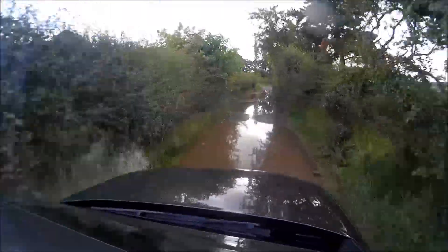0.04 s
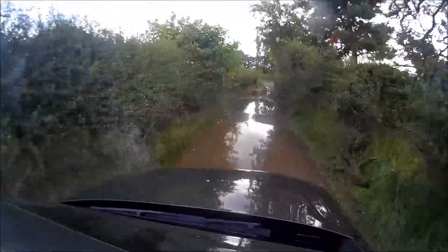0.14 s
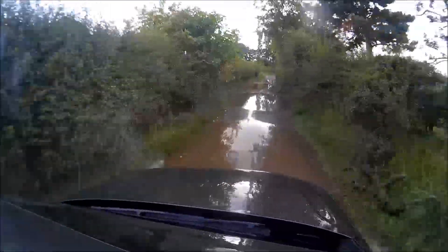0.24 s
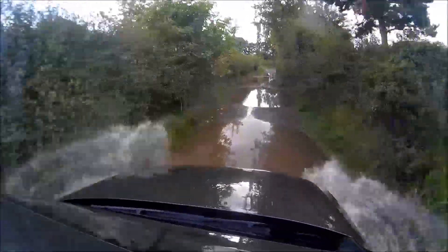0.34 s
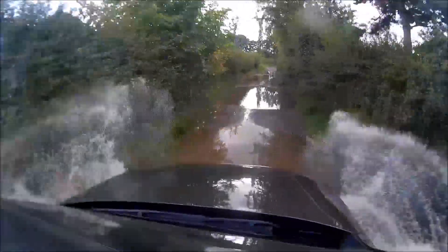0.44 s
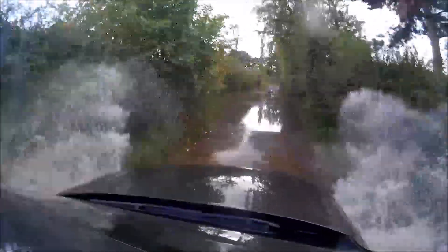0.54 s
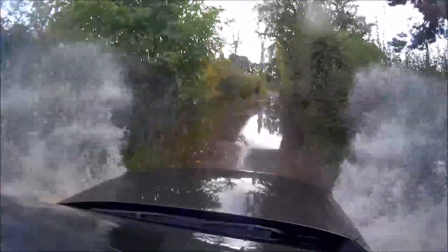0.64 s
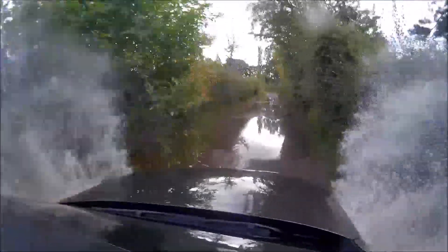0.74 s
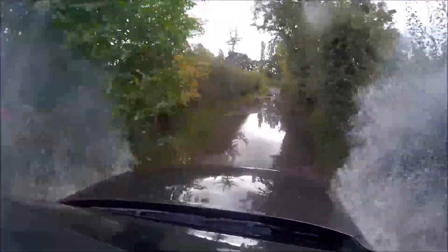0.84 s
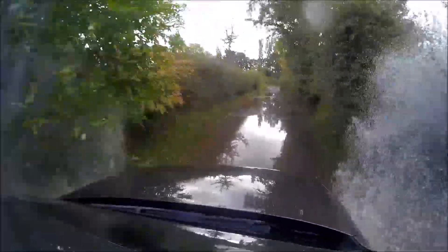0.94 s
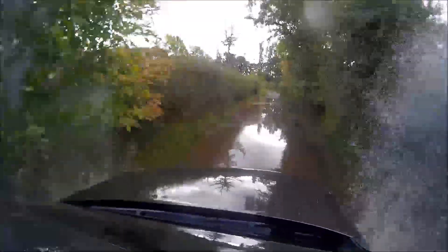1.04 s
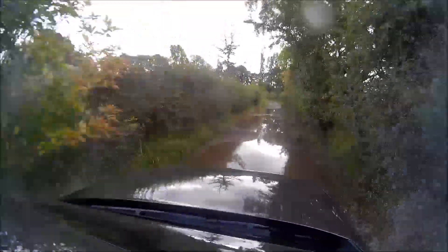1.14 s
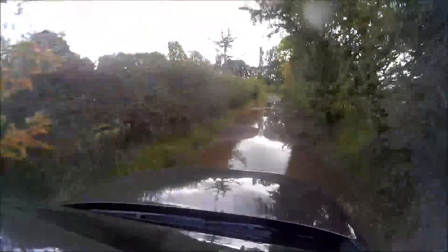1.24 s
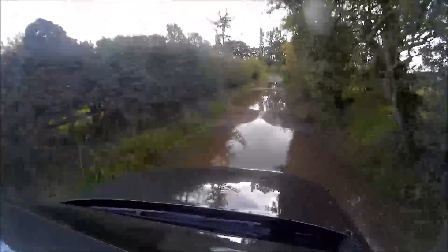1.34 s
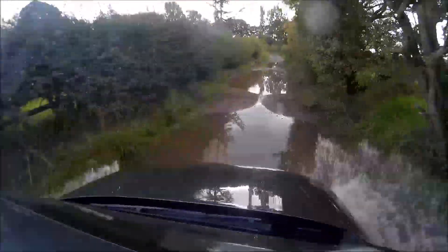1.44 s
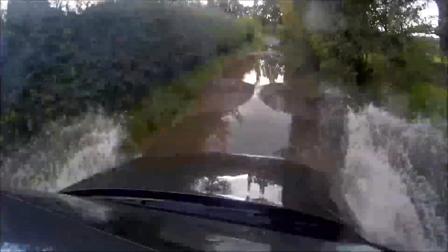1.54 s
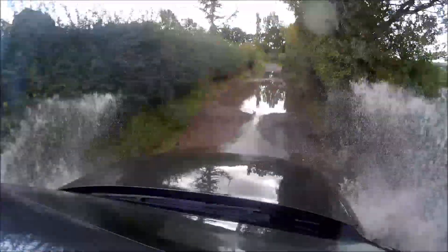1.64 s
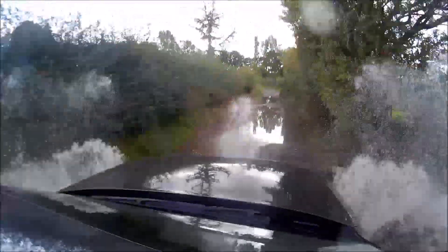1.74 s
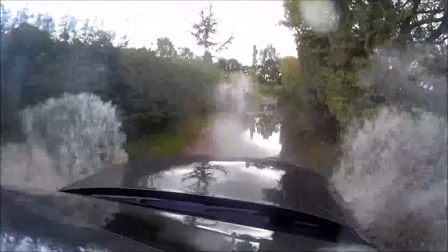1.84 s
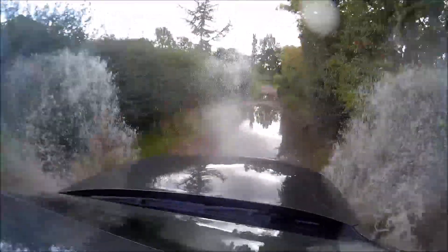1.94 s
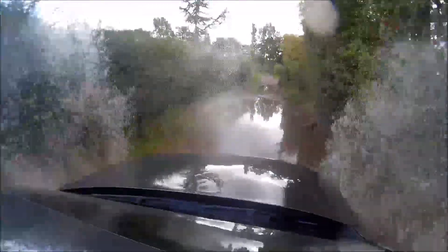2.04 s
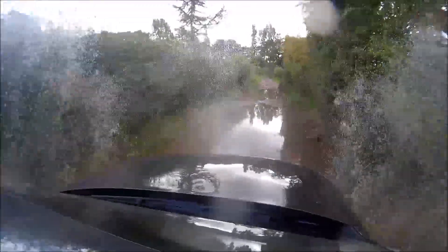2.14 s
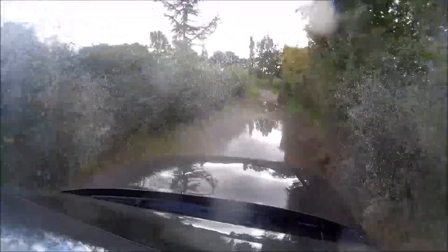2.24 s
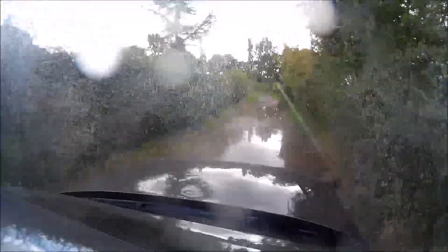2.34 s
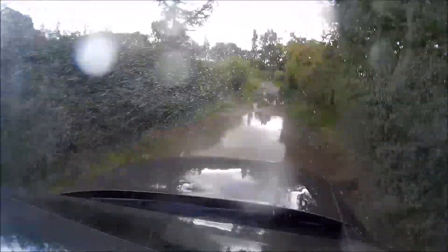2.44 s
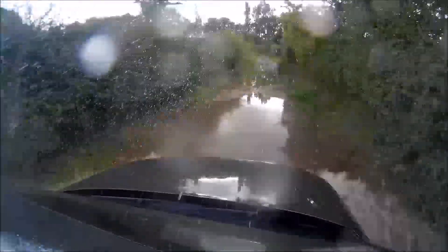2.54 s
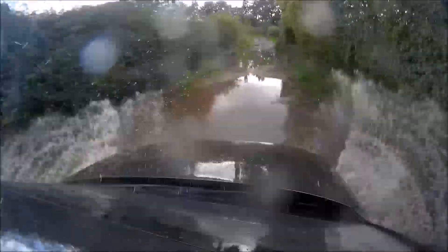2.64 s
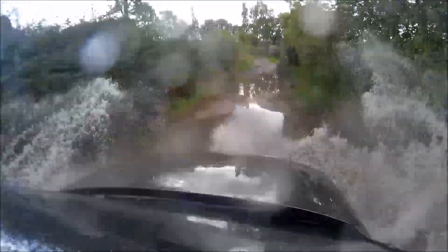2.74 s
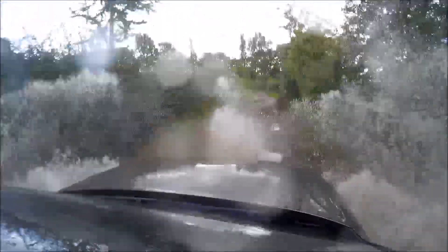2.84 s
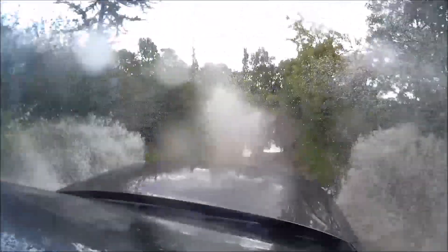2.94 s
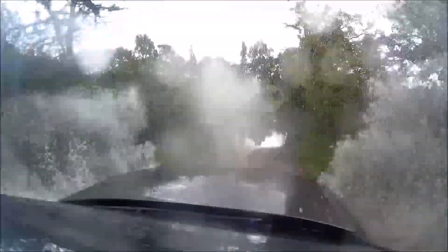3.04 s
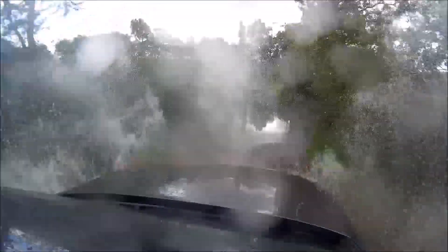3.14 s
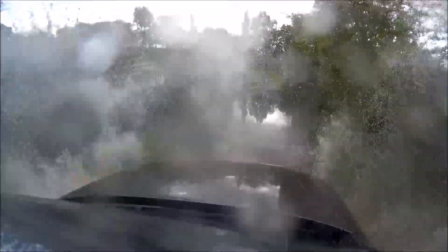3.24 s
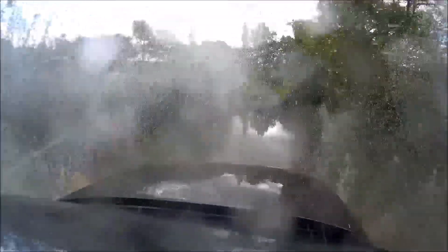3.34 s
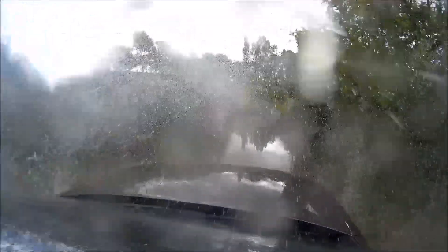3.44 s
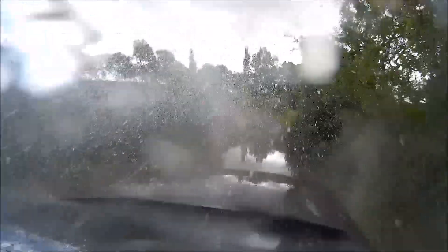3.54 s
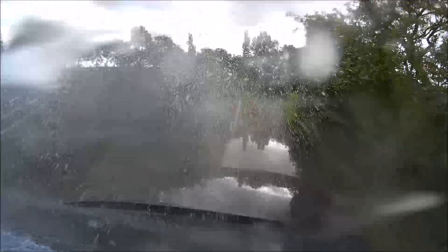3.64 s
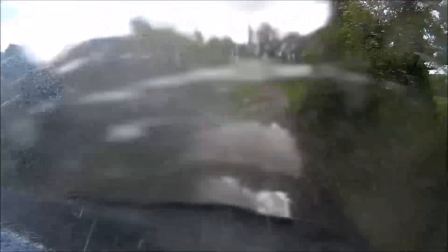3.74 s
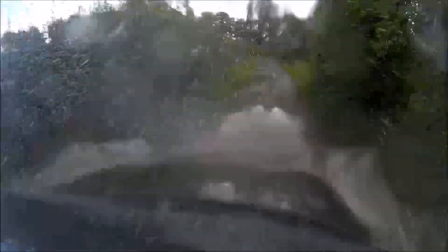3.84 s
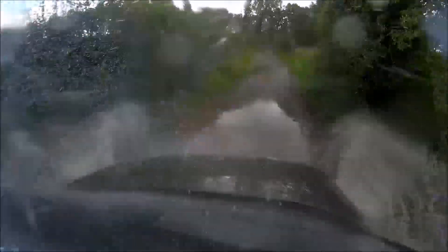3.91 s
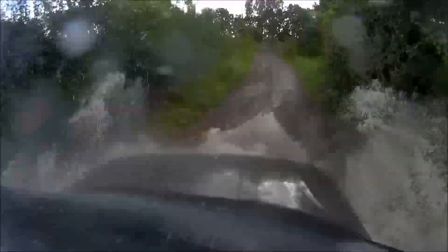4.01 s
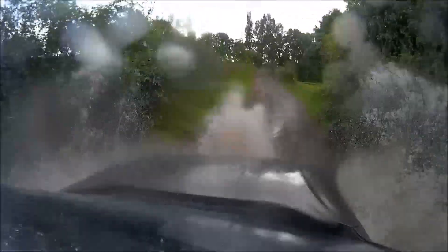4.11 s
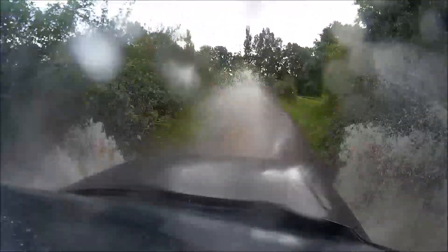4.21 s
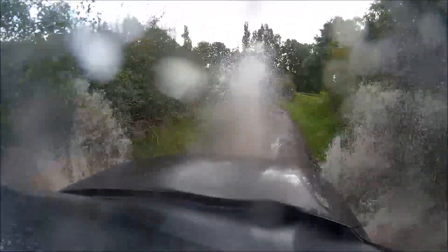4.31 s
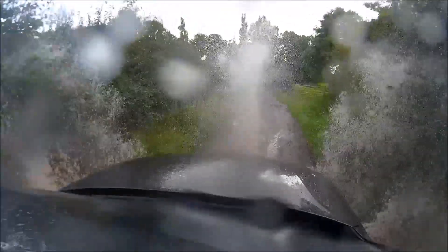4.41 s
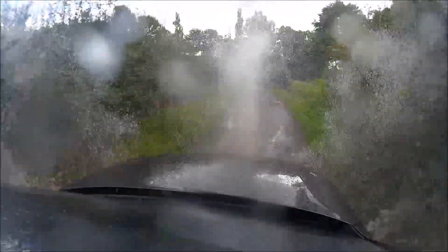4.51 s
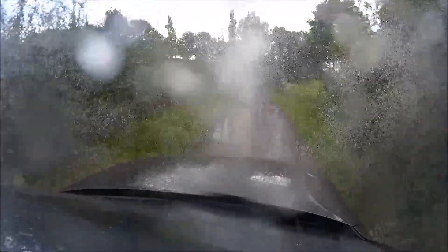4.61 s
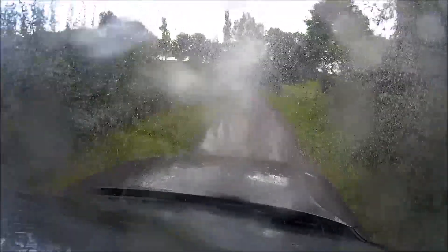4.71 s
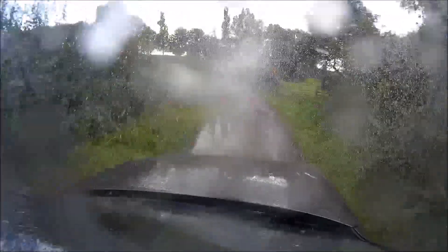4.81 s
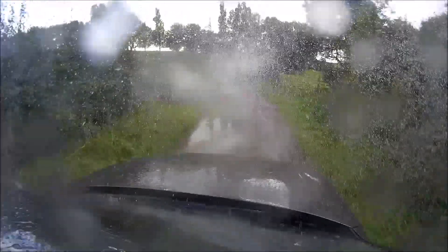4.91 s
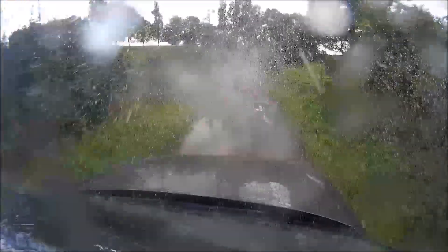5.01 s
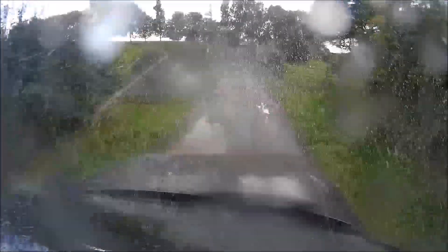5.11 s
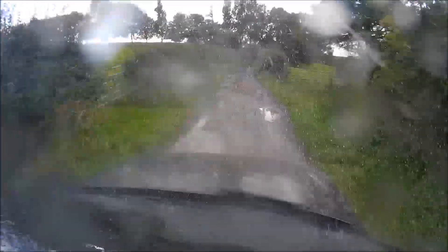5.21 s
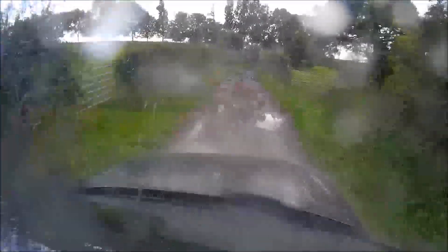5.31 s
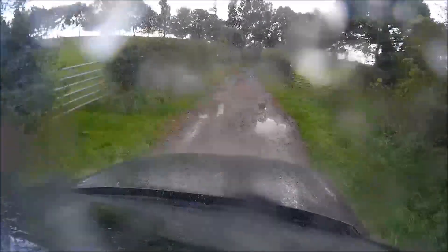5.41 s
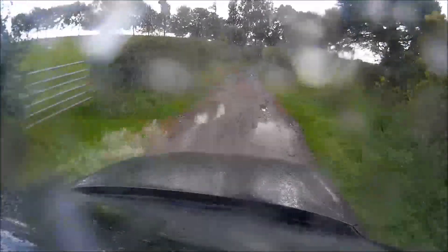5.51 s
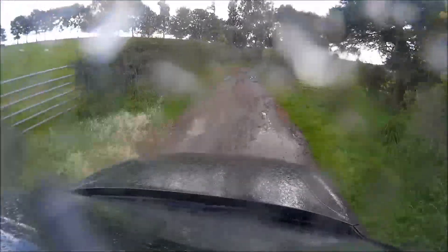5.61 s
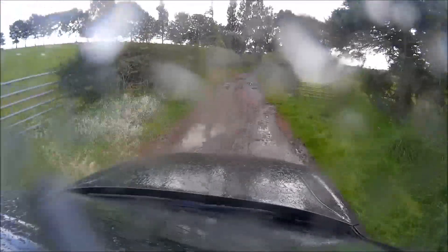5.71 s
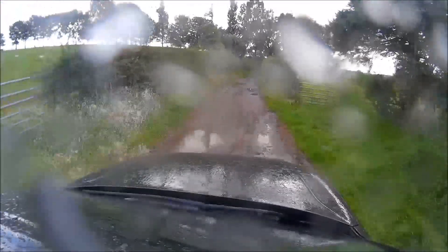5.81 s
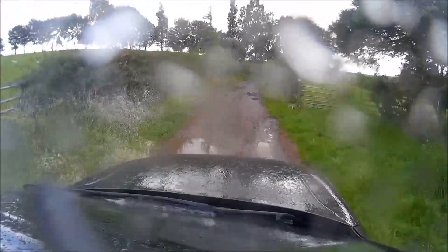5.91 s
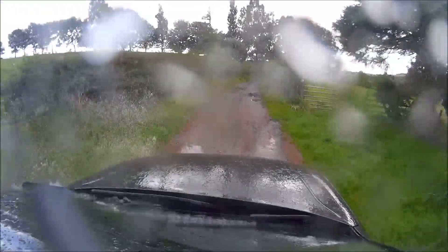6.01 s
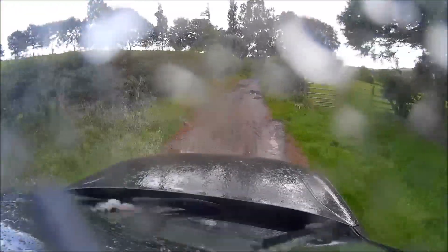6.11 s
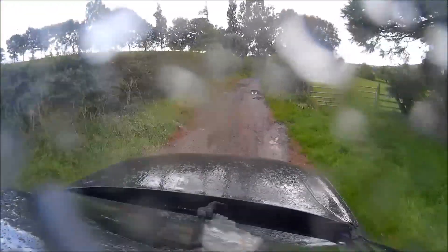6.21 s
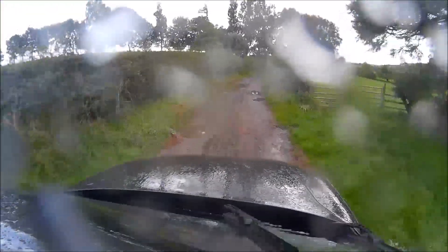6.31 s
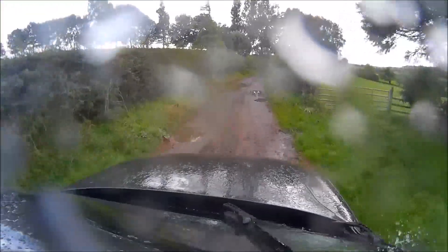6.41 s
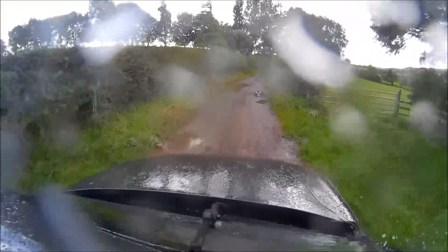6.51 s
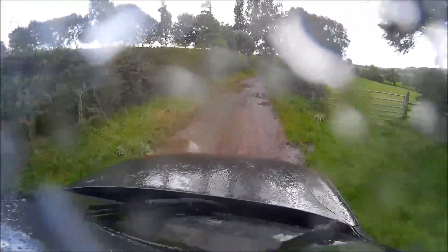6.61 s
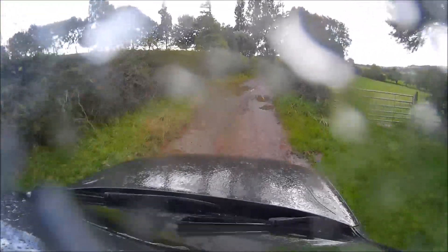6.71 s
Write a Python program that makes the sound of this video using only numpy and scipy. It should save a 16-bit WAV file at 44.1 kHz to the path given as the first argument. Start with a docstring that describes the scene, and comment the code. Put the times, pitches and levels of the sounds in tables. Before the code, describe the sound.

The sound is mono, close and boxy, from a waterproof case mounted on a vehicle's body. A wavering low boom and broad rumble run throughout, with wet tyre churn, soft hiss and a faint, very high electronic whine. From 0.35 to 1.0 s a first puddle surges and gurgles, with a run of woody clacks, strongest near 0.5. At about 1.5 s a sharp loud knock lands with a deep thump and short wash; another thump follows near 1.95. From 2.3 to 3.3 s, repeated puddles slosh, slabs thud in the arches, and brighter knocks and spatter crowd together. At 3.4-3.9 s thrown water pelts the case in a dense, fat, slapping downpour. A heavy thump hits at 4.0. Hiss and light patter return in small bursts around 4.4-5.4; after 5.8 s the hiss drops away, leaving a quieter, duller rumble to nearly 7 s.

```python
"""Farm-track puddles

An SUV ploughs through deep puddles on a farm track, heard from inside a waterproof case on its body.
The body booms over ruts (wavering sine, filtered noise); holes thump; case and mount clack (resonant knocks).
Tyres churn water (coloured impacts), air gulps under the floor (rising sines), slabs thud in the arches.
Thrown water falls as mist (hiss) and a dense patter (impacts through the case modes); big drops hit the case.
A thin electronic whine runs throughout."""
import sys
import numpy as np
from scipy import signal
from scipy.fft import rfft, irfft
from scipy.io import wavfile
from scipy.ndimage import uniform_filter1d

SR = 44100
rng = np.random.default_rng(int(sys.argv[2]) if len(sys.argv) > 2 else 0)


def generate_wav(signal):
    """Clip the signal to [-1, 1] and save it as 16-bit WAV at the path in sys.argv[1]."""
    frames = np.transpose(np.atleast_2d(signal))
    scaled = np.clip(frames, -1, 1) * 32767
    pcm = np.round(scaled).astype(np.int16)
    wavfile.write(sys.argv[1], SR, pcm)


N = 298116
TIME = np.arange(N) / SR

# Body rumble spectrum: (frequency [Hz], relative level [dB])
RUMBLE_SPECTRUM = [(12, -7.5), (24, 0), (38, -2), (55, 7), (85, 9), (110, -6), (150, -23), (220, -18),
                   (400, -49.5)]
# Track between puddles, rough and wet, then smoother and drained:
# (time [s], body drive before trims [dB], churn drive before trims [dB])
TRACK_DRIVE = [(0.0, -27.5, -37), (2.1, -28.5, -39.5), (4.3, -27, -44), (5.3, -30.5, -45),
               (6.0, -30.5, -53.5), (6.76, -32, -54)]
# Ruts that only shake the body: (time [s], length [s], body drive before trims [dB])
BODY_RUTS = [(1.956, 0.037, -21), (4.26, 0.07, -21.5), (5.382, 0.046, -23.5)]
# Wheel drops into a hole: (time [s], peak level [dB])
HOLES = [(1.474, -12), (1.949, -10), (2.699, -17), (3.358, -18), (3.97, -15), (4.019, -12)]
# Case resonances, heard in spray, drops and knock edges: (frequency [Hz], width [Hz], relative level [dB])
CASE_RESONANCES = [(430, 33, -4), (935, 670, -10), (1333, 110, 3.5), (1853, 142, 3), (2123, 64, 0),
                   (2930, 117, -3), (3203, 170, -3.5), (3750, 315, 0.5), (4225, 39, 0), (5470, 560, -5.5),
                   (9050, 2300, -14.5), (10700, 820, -6), (15300, 390, -16)]
# Case and mount resonances: (frequency [Hz], width [Hz], relative level [dB])
MOUNT_RESONANCES = [(1164, 93, 1.5), (1337, 130, 8.5), (1580, 290, -5), (1800, 111, 4)]
# Knocks on the case and mount: jolts, and water hits in the splash at 3.4-3.95 s:
# (time [s], clack level [dB], bright edge re clack [dB])
KNOCKS = [(0.1293, -28.5, -21), (0.3593, -21.5, -18), (0.433, -17.5, -19), (0.4943, -9.5, -18),
          (0.5525, -15, -20), (0.6093, -21, -20), (0.704, -22.5, -19), (0.7725, -21, -17.5),
          (0.8299, -29, -19), (0.891, -23, -20), (0.9534, -30.5, -28), (1.0212, -30.5, -20),
          (1.252, -27, -17), (1.315, -24.5, -23), (1.542, -7, -19.5), (1.604, -32, -37),
          (1.971, -27.5, -48), (2.348, -12.5, -6), (2.4586, -15, -29), (2.5224, -20.5, -7),
          (2.5577, -17, -2), (2.626, -25, -29), (2.6515, -18, -30), (2.6913, -18, -10),
          (2.7252, -15.5, -22), (2.9, -20, -28), (2.96, -11, -14.5), (3.1439, -23, -26),
          (3.201, -16.5, -23), (3.3086, -22.5, -21), (3.3181, -23.5, -6), (3.489, -15.5, -11),
          (3.6553, -20, -6), (3.8664, -16, -3.5), (3.9355, -21, -20), (4.1116, -31, -2)]
# Tyre churn spectrum: (frequency [Hz], relative level [dB])
CHURN_SPECTRUM = [(110, 8.5), (200, 0), (285, 1.5), (420, 4.5), (570, 2), (760, -8), (1050, -2), (1320, -3),
                  (1550, -2.5), (1800, -7), (2100, -3.5), (2500, -39.5), (4000, -43.5)]
# Wheels plough a puddle: (time [s], length [s], wash drive before trims [dB])
PUDDLE_PASSES = [(0.5, 0.26, -33.5), (1.507, 0.059, -25.5), (2.373, 0.16, -30.5), (2.624, 0.14, -28.5),
                 (3.013, 0.24, -29.5), (3.563, 0.24, -32.5), (3.947, 0.052, -28.5)]
# Water slabs on the wheel arches: (time [s], panel level [dB], pitch [Hz])
ARCH_SLAPS = [(0.431, -25.5, 430), (0.521, -21, 436), (0.612, -23.5, 376), (1.513, -21.5, 354),
              (2.3469, -13.5, 385), (2.426, -21.5, 360), (2.493, -19, 390), (2.625, -16.5, 415),
              (2.69, -17, 420), (2.766, -20.5, 377), (3.045, -21, 440), (3.249, -25, 406),
              (3.307, -21.5, 450), (3.593, -21, 390), (3.9734, -13.5, 228), (3.974, -20, 447),
              (4.01, -27, 450)]
# Mist off wet tyres: (time [s], flow before trim [dB], treble gain [dB])
MIST_FLOW = [(0.0, -40, -10.5), (0.88, -41.5, 1), (1.65, -43.5, -4.5), (2.15, -44.5, 3.5), (2.85, -43, 3.5),
             (5.42, -42.5, 2), (5.72, -43, -3.5), (5.86, -55.5, -5), (6.76, -59, -8)]
# Thrown water lands on the car: (time [s], length [s], flow before trim [dB], fat re fine drops [dB])
WATER_SHOWERS = [(2.18, 0.048, -40, -19.5), (2.352, 0.12, -30.5, -20), (3.177, 0.09, -28, -13),
                 (3.427, 0.29, -24, 2), (3.666, 0.26, -20.5, 9.5), (4.052, 0.31, -37, -4),
                 (4.564, 0.057, -36.5, -6.5), (4.73, 0.22, -38, 2.5), (5.015, 0.1, -33, 10.5),
                 (5.276, 0.032, -36.5, 1.5), (5.418, 0.032, -36.5, -1.5)]
# Drops and gobs on the case: (time [s], smack level [dB], top-band tick re smack [dB])
CASE_DROPS = [(1.355, -20.5, -9.5), (1.48, -28.5, 6.5), (2.4262, -20.5, -15), (2.4632, -21, -23),
              (2.5427, -19.5, 1), (2.707, -28, -7), (3.42, -23, -16), (3.4291, -21, -16),
              (3.5311, -18.5, -3.5), (3.6, -18.5, -15), (3.611, -13.5, -37), (3.683, -24, -3),
              (3.6908, -20, -5), (3.7156, -16.5, -8.5), (3.7463, -12.5, -20), (3.7852, -15, -16),
              (3.791, -14.5, -21), (3.7948, -18, -18), (3.8302, -17, -10.5), (3.8531, -19, -30),
              (3.902, -19.5, -21), (4.4276, -35, -25), (4.7495, -30.5, -7), (4.7657, -28.5, -8),
              (5.007, -30, -9.5), (5.0467, -30, -14), (5.0704, -29.5, -7), (5.1057, -28, -23),
              (5.1685, -29, -10), (5.2704, -29, -28), (5.628, -38.5, -10)]

TOP_HZ = 15450
WHINE_HZ, WHINE_DB = 9519, -58.5
BOOM_HZ = 72.9
RUT_ATTACK_S, RUT_RELEASE_S = 0.029, 0.12
PUDDLE_RISE_SHARE, PUDDLE_RELEASE_SHARE = 0.36, 0.81  # time constants per puddle length
PUDDLE_BOOM_DB, HEAVE_DB = 0, 6  # re puddle wash drive
BUMP_HZ, BUMP_DECAY_S = 61, 0.0073
HIT_S = 0.014  # time over which a hit's level is reckoned
AFTER_RING_HZ, AFTER_RING_DB = 1739, -13.5
SLOSH_HZ, SLOSH_OCTAVES, SLOSH_DB = 416.6, 0.853, -0.5  # middle pitch, range, level re wash drive
GULPS_PER_S, GULP_DECAY_CYCLES, GULP_RISE_PER_S = 200, 5, 2
SHOWER_ATTACK_S, SHOWER_RELEASE_S = 0.084, 0.06
# Drops re mist at the downpour level; dB change per dB of shower
DOWNPOUR_DB, DROP_SHARE_DB, DROP_SHARE_SLOPE = -16, 14, 0.37
CLUMP_DB, CLUMPS_PER_S = 3.5, 45


def undb(db):
    """Decibels to gain."""
    return 10 ** (np.asarray(db) / 20)


def decibels(power):
    """Power to decibels."""
    return 10 * np.log10(power + 1e-12)


def curve(rows, axis=1):
    """Interpolate one table column at every sample."""
    columns = np.transpose(rows)
    return np.interp(TIME, columns[0], columns[axis])


def unit(x):
    """Scale to rms 1."""
    return x / np.sqrt(np.mean(x ** 2))


def peak(x):
    """Scale to peak 1."""
    return x / np.abs(x).max()


def hit(x):
    """Scale a short sound to the energy of rms 1 held for HIT_S."""
    return x / np.sqrt(np.sum(x ** 2) / (HIT_S * SR))


def add(track, s, sound):
    """Mix a sound in at a time."""
    start = max(int(s * SR), 0)
    track[start:start + len(sound)] += sound[:max(N - start, 0)]


def walk(rate_hz):
    """Smooth random wander with a spread near 1."""
    hold = max(int(SR / rate_hz), 1)
    steps = np.repeat(rng.standard_normal(N // hold + 1), hold)
    smooth = uniform_filter1d(uniform_filter1d(steps, hold), hold)
    return 1.3 * smooth[:N]


def cut(x, hz, kind, order=2):
    """Low-pass or high-pass."""
    return signal.sosfilt(signal.butter(order, min(hz, TOP_HZ), kind, fs=SR, output="sos"), x)


def shape(x, gain_at, size=8192):
    """Minimum-phase filter whose gain is a function of frequency."""
    gain = gain_at(np.arange(size // 2 + 1) * SR / size + 1)
    cepstrum = irfft(np.log(gain + 1e-6))
    # fold to a causal response
    cepstrum[1:size // 2] *= 2
    cepstrum[size // 2 + 1:] = 0
    response = irfft(np.exp(rfft(cepstrum)))
    return signal.fftconvolve(x, response)[:len(x)]


def colour(x, points):
    """Filter by a spectrum, interpolated over log frequency."""
    hz, db = np.transpose(points)
    return shape(x, lambda f: undb(np.interp(np.log(f), np.log(hz), db)))


def ring(x, modes):
    """Filter by a set of resonances whose powers add."""
    def gain_at(f):
        power = sum(undb(db) ** 2 / (1 + ((f * f - hz * hz) / (f * width_hz)) ** 2)
                    for hz, width_hz, db in modes)
        return np.sqrt(power)
    return shape(x, gain_at)


def blow(scatter_s, scatter_db, size=4096):
    """A sharp push plus a dying scatter of smaller contacts."""
    force = rng.standard_normal(size) * np.exp(-np.arange(size) / SR / scatter_s)
    force *= undb(scatter_db) / np.linalg.norm(force)
    force[0] += 1
    return force


def patter(per_s, spread_db):
    """Random impacts, many small and a few large, at rms 1."""
    sizes = undb(spread_db * np.minimum(rng.exponential(size=N), 4.5))
    strikes = rng.random(N) < per_s / SR
    return unit(strikes * sizes * rng.choice([-1, 1], N))


def swell(s, length_s, db, attack_s, release_s):
    """Power of a surge that builds up to s, holds and dies away."""
    away = np.maximum(s - TIME, 0) / attack_s + np.maximum(TIME - s - length_s, 0) / release_s
    return (undb(db) * np.exp(-np.minimum(away, 20))) ** 2


def ploughing():
    """Power of the wash under the wheels; longer puddles rise and die away more slowly."""
    return sum(swell(s, length_s, db, PUDDLE_RISE_SHARE * length_s, PUDDLE_RELEASE_SHARE * length_s)
               for s, length_s, db in PUDDLE_PASSES)


def falling():
    """Power of the thrown water landing on the car."""
    return sum(swell(s, length_s, db, SHOWER_ATTACK_S, SHOWER_RELEASE_S)
               for s, length_s, db, _ in WATER_SHOWERS)


def electronic_whine():
    """Steady thin tone."""
    return undb(WHINE_DB) * unit(np.sin(2 * np.pi * WHINE_HZ * TIME))


def body(plough):
    """Track shakes the body: a wavering boom over broad rumble, driven by track, ruts and puddles."""
    phase = 2 * np.pi * np.cumsum(BOOM_HZ + 3.79 * walk(14)) / SR
    boom = unit(np.sin(phase) * undb(3.45 * walk(22)))
    rumble = unit(colour(rng.standard_normal(N), RUMBLE_SPECTRUM))
    ruts = sum(swell(s, length_s, db, RUT_ATTACK_S, RUT_RELEASE_S) for s, length_s, db in BODY_RUTS)
    ride_db = decibels(undb(curve(TRACK_DRIVE)) ** 2 + ruts + undb(PUDDLE_BOOM_DB) ** 2 * plough)
    # harder shaking favours the broad rumble
    rumble_db = -1.5 + 0.13 * (ride_db - ride_db.mean())
    return (undb(-2.5) * boom + undb(rumble_db) * rumble) * undb(ride_db)


def suspension(plough):
    """Deep water heaves against the floor; wheels thump into holes."""
    heave = unit(cut(cut(rng.standard_normal(N), 64.5, "low", order=4), 28, "high"))
    out = heave * undb(HEAVE_DB) * np.sqrt(plough)
    thump = peak(np.sin(2 * np.pi * BUMP_HZ * TIME) * TIME * np.exp(-TIME / BUMP_DECAY_S))
    for s, db in HOLES:
        add(out, s, undb(db) * thump)
    return out


def knock(edge_db):
    """A short woody clack, slightly retuned each time, with a bright edge and a brief after-ring."""
    tuning = 1 + 0.015 * rng.standard_normal()
    force = blow(scatter_s=0.004, scatter_db=-11)
    # smear the contact over a few milliseconds
    force = np.convolve(force, blow(scatter_s=0.002, scatter_db=-7, size=256))[:len(force)]
    clack = ring(force, [(hz * tuning, width_hz, db) for hz, width_hz, db in MOUNT_RESONANCES])
    clack = cut(cut(clack, 2360, "low", order=6), 944, "high", order=3)
    after = ring(clack, [(AFTER_RING_HZ, 25, 0)])
    edge = ring(blow(scatter_s=0.0014, scatter_db=12), CASE_RESONANCES)
    edge = cut(cut(edge, 2150, "high", order=4), 5200, "low")
    return hit(clack) + undb(AFTER_RING_DB) * hit(after) + undb(edge_db) * hit(edge)


def case_and_mount():
    """Jolts, and water hits in the splash at 3.4-3.95 s, knock the case and mount."""
    out = np.zeros(N)
    for s, db, edge_db in KNOCKS:
        add(out, s, undb(db) * knock(edge_db))
    return out


def arches():
    """Slabs of water break up on an arch, which rings briefly and passes on a low bump."""
    out = np.zeros(N)
    for s, db, hz in ARCH_SLAPS:
        force = blow(scatter_s=0.0061, scatter_db=-0.5)
        panel = ring(force, [(hz, 130, 0), (1.34 * hz, 150, -10)])
        panel = cut(cut(panel, 1.47 * hz, "low", order=3), 0.54 * hz, "high")
        bump = cut(ring(force, [(55.4, 170, 0)]), 170, "low")
        add(out, s, undb(db) * (hit(panel) + undb(-6.5) * hit(bump)))
    return out


def slosh(plough):
    """Water surging under the floor traps air pockets; each gulps briefly, rising in pitch."""
    out = np.zeros(N)
    age_s = TIME[:SR // 8]
    for when, size, strength in rng.random((int(GULPS_PER_S * N / SR), 3)):
        hz = SLOSH_HZ * 2 ** (SLOSH_OCTAVES * (size - 0.5))
        cycles = hz * age_s
        phase = 2 * np.pi * cycles * (1 + GULP_RISE_PER_S * age_s)
        envelope = (1 - np.exp(-cycles)) * np.exp(-cycles / GULP_DECAY_CYCLES)
        add(out, when * N / SR, (0.5 + strength) * np.sin(phase) * envelope)
    return unit(out) * undb(SLOSH_DB) * np.sqrt(plough)


def tyres(plough):
    """Lumps of water and mud churn in uneven surges; the mount chatters along, more in heavy churn."""
    lumps = patter(per_s=300, spread_db=3.5) + undb(-0.5) * rng.standard_normal(N)
    wash = unit(colour(lumps * undb(2.1 * walk(45)), CHURN_SPECTRUM))
    taps = patter(per_s=200, spread_db=3)
    chatter = unit(cut(ring(taps, MOUNT_RESONANCES), 1850, "low", order=5))
    churn_db = decibels(undb(curve(TRACK_DRIVE, axis=2)) ** 2 + plough / 2)
    chatter_db = -4 + 0.48 * (churn_db - churn_db.max())
    return (wash + undb(chatter_db) * chatter) * undb(churn_db + 2.5)


def mist_hiss():
    """Mist: a dull hiss with a bright top of varying strength, both through the case."""
    dull = cut(unit(ring(rng.standard_normal(N), CASE_RESONANCES)), 4960, "low")
    bright = cut(unit(ring(rng.standard_normal(N), CASE_RESONANCES)), 4400, "high")
    return (dull + undb(curve(MIST_FLOW, axis=2)) * bright) * undb(1.43 * walk(40))


def fine_drops(crowd):
    """Fine drops: each size ticks in its own band, through the case."""
    ticks = sum(ring(patter(per_s=160 * crowd, spread_db=2.0), [(hz, 0.5 * hz, 0)])
                for hz in np.geomspace(1700, 12500, 5))
    return unit(ring(ticks, CASE_RESONANCES))


def fat_drops(crowd):
    """Fat drops spread for about a millisecond; each stream of them has its own dullness."""
    slaps = 0
    for top_hz in np.geomspace(2800, 6500, 5):
        impacts = patter(per_s=65 * crowd, spread_db=2)
        spread = signal.fftconvolve(impacts, blow(scatter_s=0.001, scatter_db=0.0))[:N]
        slaps = slaps + unit(cut(spread, top_hz, "low", order=3))
    return unit(ring(slaps, CASE_RESONANCES))


def spray(shower):
    """Mist hisses, fine drops tick, fat drops slap; more water brings more drops, in clumps."""
    flow_db = decibels(undb(curve(MIST_FLOW)) ** 2 + shower)
    crowd = undb(0.5 * (flow_db - flow_db.max()))
    # heavier showers lift the drops out of the mist
    share = undb(DROP_SHARE_DB + DROP_SHARE_SLOPE * (decibels(shower) - DOWNPOUR_DB))
    mist = mist_hiss()
    fine = fine_drops(crowd)
    fat = fat_drops(crowd)
    fatness = undb(curve([(s + length_s / 2, fat_db) for s, length_s, _, fat_db in WATER_SHOWERS]))
    # offset the level change due to drop rate and mix
    drops = (fine + fatness * fat) / np.sqrt((1 + fatness ** 2) * crowd / crowd.mean())
    drops = drops * undb(0.5 + CLUMP_DB * walk(CLUMPS_PER_S))
    water = (share * drops + mist) / np.sqrt(1 + share ** 2)
    return cut(water, 200, "high") * undb(flow_db + 1.4)


def big_drops():
    """Water smacks the case: a burst and brief spatter ring its walls, under a bright tick."""
    out = np.zeros(N)
    for s, db, top_db in CASE_DROPS:
        burst = blow(scatter_s=0.00088 * 2 ** rng.uniform(-1.3, 1), scatter_db=-7)
        spatter = blow(scatter_s=0.0046, scatter_db=-6)
        smack = ring(np.convolve(burst, spatter)[:len(burst)], CASE_RESONANCES)
        # brighter drops have less low end
        low_edge_hz = 1650 * undb(0.38 * (top_db + 5.0))
        smack = cut(cut(smack, low_edge_hz, "high", order=3), 4100, "low")
        tick = ring(blow(scatter_s=0.00067, scatter_db=11), CASE_RESONANCES)
        tick = cut(tick, 6800, "high", order=4)
        add(out, s, undb(db) * (hit(smack) + undb(top_db) * hit(tick)))
    return out


def scene():
    """Sum of whine, ride, knocks and water; one channel."""
    plough = ploughing()
    shower = falling()
    ride = body(plough) + suspension(plough)
    under_car = arches() + slosh(plough) + tyres(plough)
    thrown_water = spray(shower) + big_drops()
    return (electronic_whine() + ride + case_and_mount() + under_car + thrown_water)[None]


def record(dry):
    """Input clips at full scale, then a steep low-pass cuts the top."""
    top_cut = signal.ellip(8, 0.2, 70, TOP_HZ, fs=SR, output="sos")
    return signal.sosfilt(top_cut, np.clip(dry, -1, 1))


dry = scene()
out = record(dry)
generate_wav(out)
```